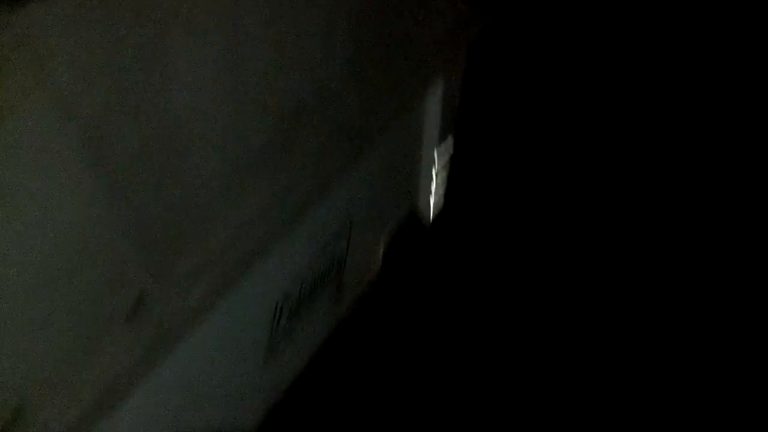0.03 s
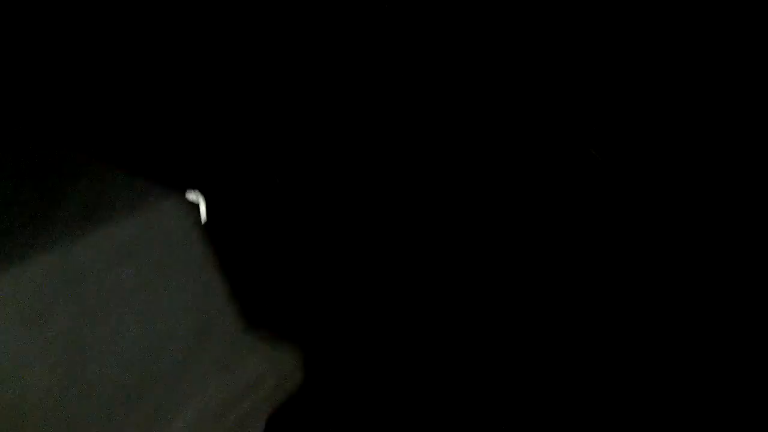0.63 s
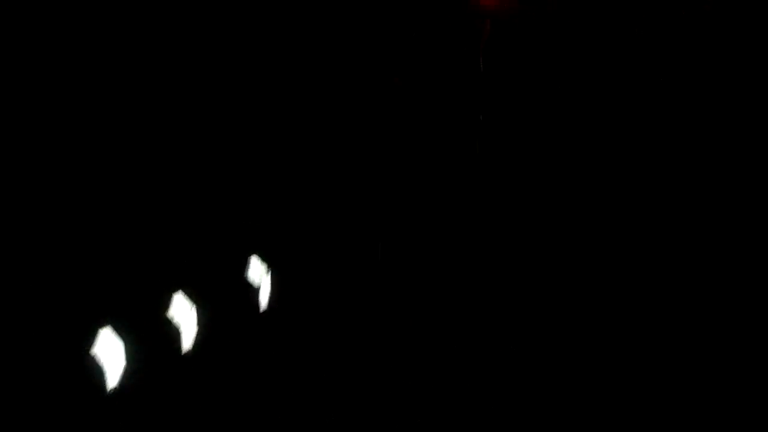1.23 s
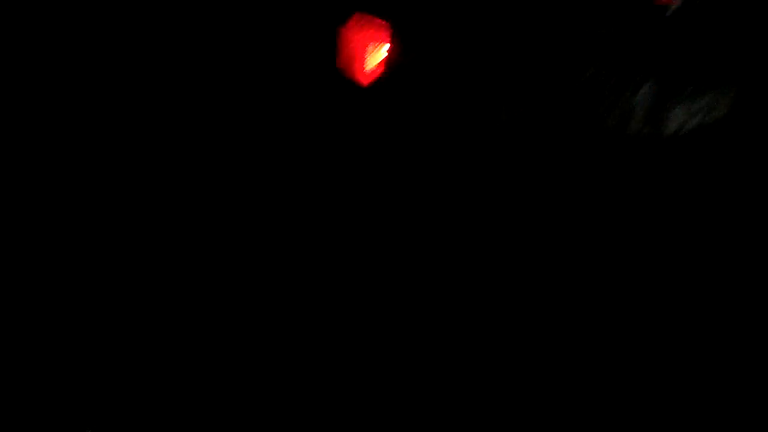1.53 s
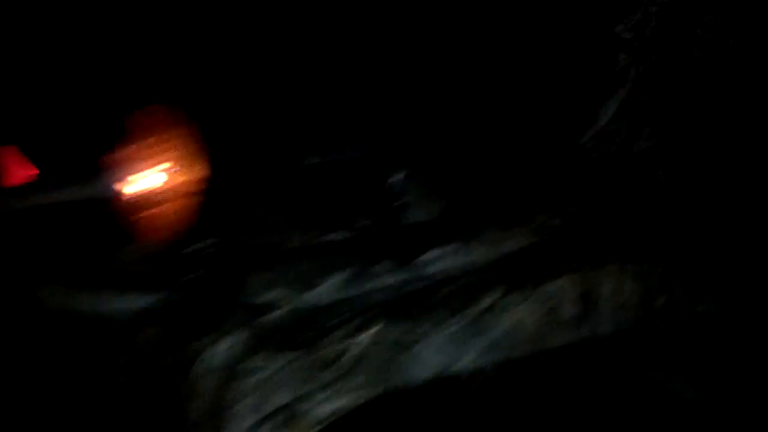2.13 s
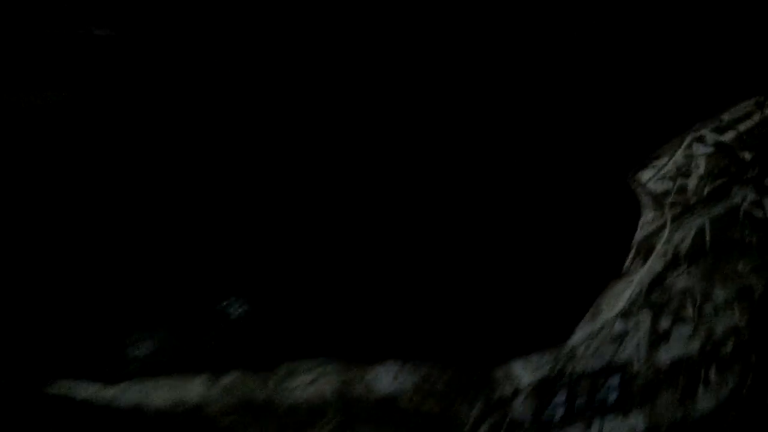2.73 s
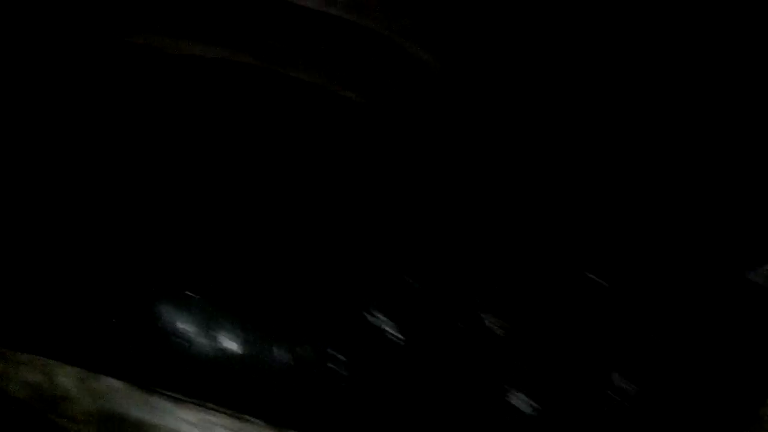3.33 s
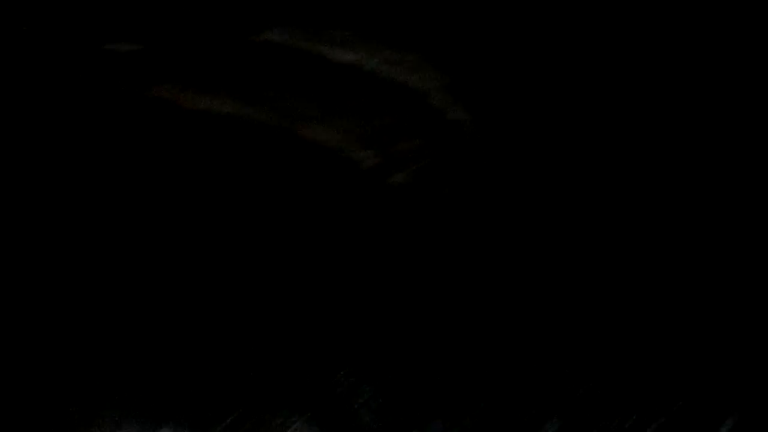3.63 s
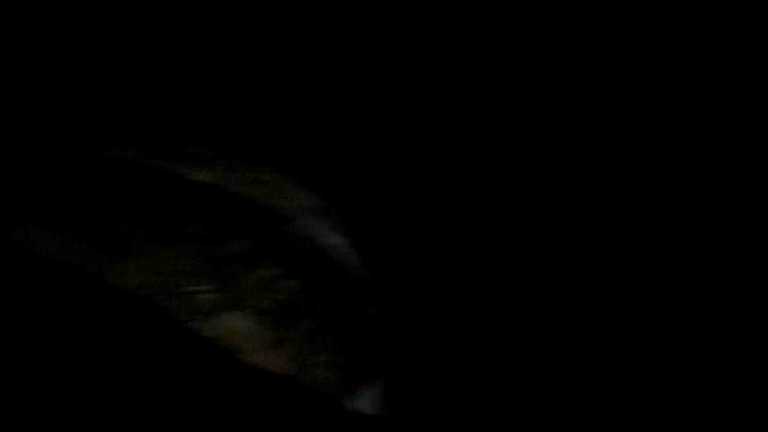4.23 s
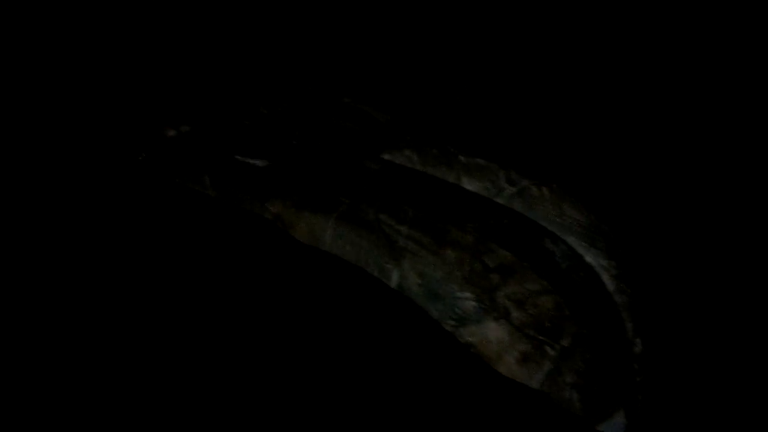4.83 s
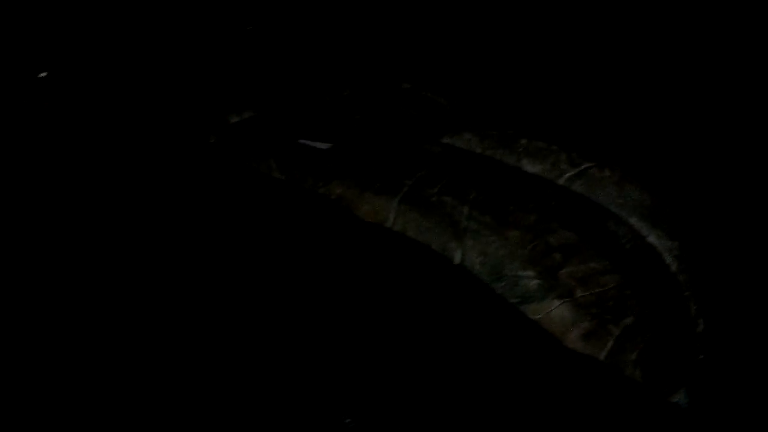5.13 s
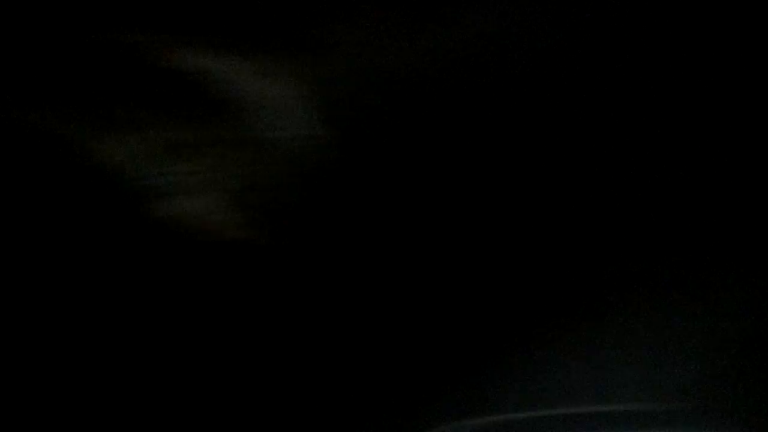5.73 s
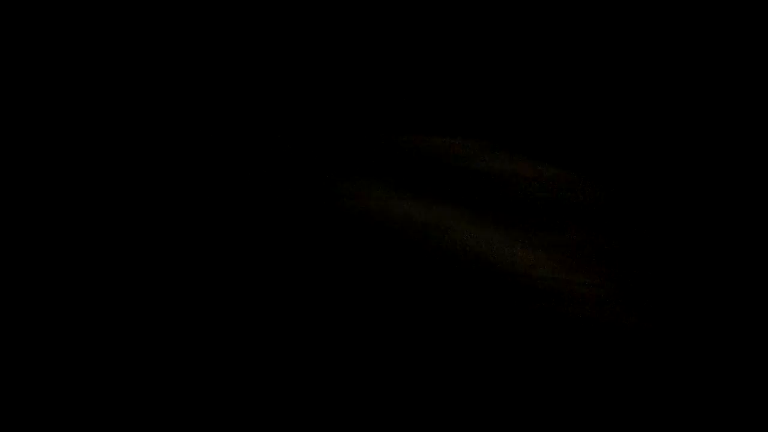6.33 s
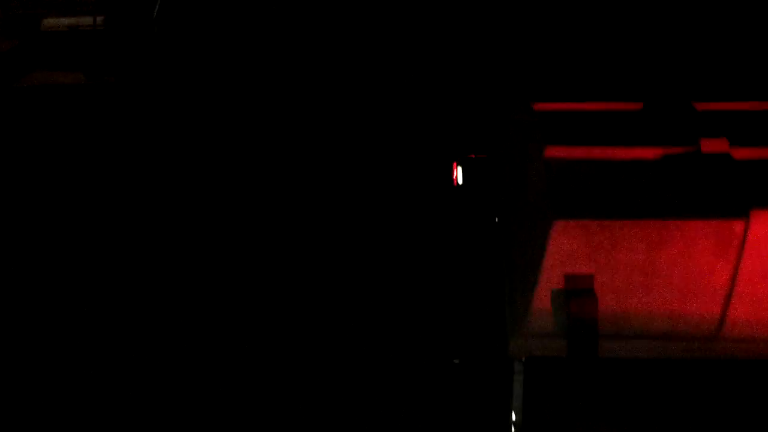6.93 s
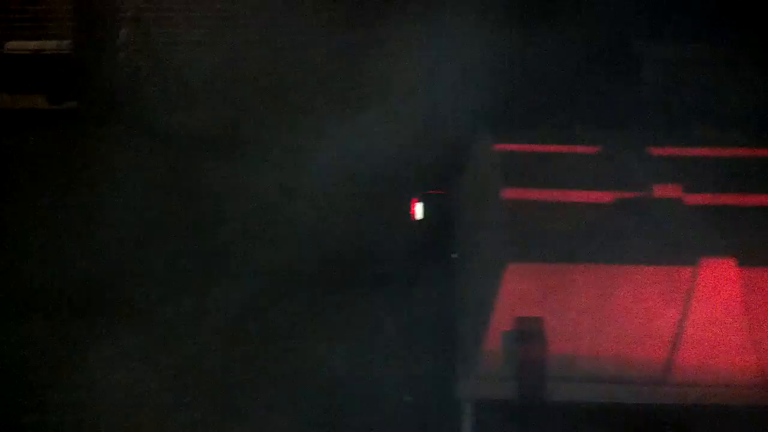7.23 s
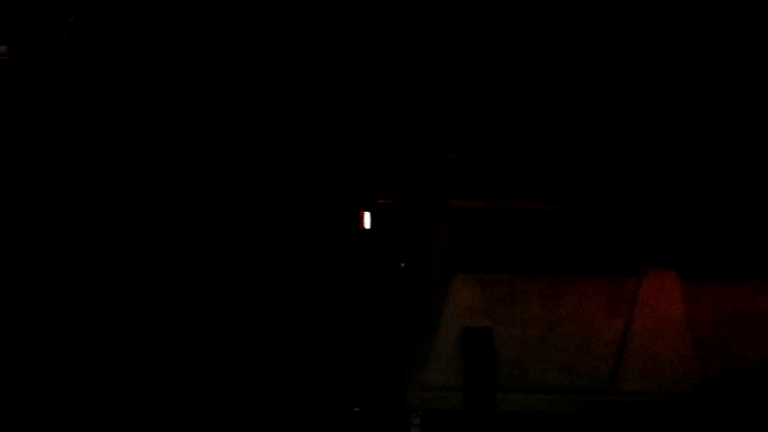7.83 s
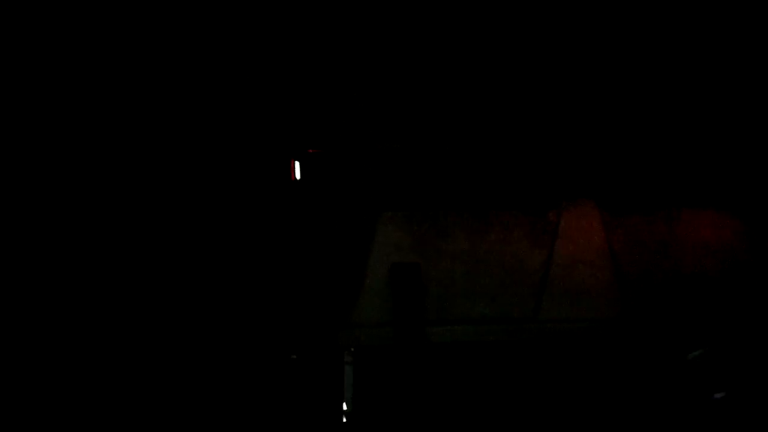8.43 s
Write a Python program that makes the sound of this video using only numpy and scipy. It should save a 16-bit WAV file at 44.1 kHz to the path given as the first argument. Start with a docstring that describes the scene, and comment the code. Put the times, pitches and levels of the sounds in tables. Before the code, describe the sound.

Leafy footsteps and rustling nylon over a steady idling engine, then knocks on a plastic panel, a short zip and small clicks.

```python
"""Leafy ground at night: someone with a handheld camera walks past a pickup idling a little way off.
Leaves crush in grains under each shoe, twigs snap, grit rasps; a nylon jacket fizzes as its threads
catch and slip. A sleeve rubs close by, blows ring a plastic panel on a parked quad bike, a zipper
rasps, and a latch, a switch and other small hard parts click. The camera's stereo widener combs its
two hissing microphones, and its gain control ducks after the sharpest click."""
import sys
import numpy as np
from scipy import signal
from scipy.fft import rfft, irfft
from scipy.io import wavfile
from scipy.ndimage import uniform_filter1d

SR = 44100
rng = np.random.default_rng(int(sys.argv[2]) if len(sys.argv) > 2 else 0)


def file_out(sig):
    """Save sig as 16-bit WAV at sys.argv[1]."""
    # one column per channel
    cols = np.atleast_2d(sig).T
    # limit, then scale
    lim = np.clip(cols, -1, 1)
    pcm = np.round(lim * 32767).astype(np.int16)
    wavfile.write(sys.argv[1], SR, pcm)


N = 374409
T = np.arange(N) / SR

# engine tones: multiple of the crankshaft speed, relative level/dB
ENGINE_ORDERS = [(6, -79.5), (8, -100), (10, -70.5), (12, -70), (18, -78.5), (20, -79), (24, -73.5),
                 (30, -59.5), (36, -82), (44, -66.5), (70, -71.5), (76, -70)]
# how the idle reaches the moving camera: t/s, exhaust gain/dB, bay roar gain/dB, left-right/dB
ENGINE_FADERS = [(0, 8.5, 2.5, -4.5), (1, 12, 1.5, -3.5), (2, 9.5, 2.5, -5), (3, 11.5, 3, -5.5),
                 (3.8, 8, 5, -3.5), (4.6, 0, 3, -3), (5.4, 2, 1.5, 4.5), (6.1, 2.5, -1, -1.5),
                 (6.8, 11.5, 1.5, 4.5), (7.5, 9.5, 1.2, 4.5), (8, 7, 3, 2.5), (8.49, 12, 4.5, 0.5)]
# the engine bay's whine comes forward as the camera nears the pickup: t/s, gain/dB
WHINE_FADER = [(0, -6), (1.5, -2), (6, -1), (7, 1.5)]

# tone colours of the noise layers: f/Hz, relative level/dB
ROAR_EQ = [(25, -22), (45, -33), (80, -7.5), (130, -3), (230, -6.5), (380, -5.5), (680, -8), (890, -5.5),
           (1080, -11.5), (1350, -18), (2000, -18.5), (3000, -21.5), (6000, -30.5), (10000, -34.5)]
HISS_EQ = [(100, 18), (3000, 10), (6500, -5), (9500, -10), (12000, 10.5), (15000, 13.5)]
LEAVES_EQ = [(50, -15), (130, -3), (300, 2), (600, 8.5), (900, -0.5), (1300, 1.5), (1800, -5), (2400, -4.5),
             (3500, -15.5), (7000, -25), (15000, -40)]
NYLON_EQ = [(500, -11), (1500, -3), (2500, -1.5), (4000, -2.5), (6500, -1), (9500, -5), (12000, -2.5),
            (15000, 1.5)]
CREASE_EQ = [(300, -18), (1200, 3), (2200, -3), (4000, 1), (7500, -10.5), (15000, -0.5)]
THUD_EQ = [(30, -10), (90, -10), (170, 1), (280, 1.5), (500, -6), (900, -2.5), (1400, -17), (2500, -21),
           (4500, -32), (8000, -48), (15000, -54)]
CLICK_EQ = [(100, -39), (400, -21), (1500, -30.5), (2700, -12), (4200, -3.5), (5200, -2), (7000, 1.5),
            (10000, -4.5), (12500, 3), (14500, 10)]
GRIT_EQ = [(400, -38), (800, -2), (1000, 4), (1300, 1), (1600, -2), (1900, -16), (2300, -13), (4000, -45)]
SLEEVE_EQ = [(60, -43), (170, -10.5), (260, 0.5), (320, -10.5), (375, 7.5), (440, -2.5), (500, 0.5),
             (570, 4), (680, -9.5), (850, -7), (1300, -23), (2200, -18.5), (2750, -12), (3400, -34)]
CRACK_EQ = [(200, -21), (800, 15.5), (1400, -7), (2200, 4.5), (3500, -2.5), (4800, -10), (7200, -11.5),
            (9000, -17), (15000, -38)]  # hard contact wakes the panel's many small modes
ZIPPER_EQ = [(400, -20), (1500, -21), (3000, 6), (6500, -12), (10000, 1), (12500, 7), (15000, 6)]

# each footfall crushes leaves and swings the jacket:
# peak t/s, rise/s, fall/s, relative leaves level/dB, nylon level/dB, treble tilt/(dB per octave)
FOOTFALLS = [(.13, 0.05, 0.12, -54, -54, -0.5), (.73, 0.061, 0.15, -53, -47.5, 1),
             (1.24, 0.045, 0.037, -59, -42, -2.5), (1.335, 0.012, 0.043, -59, -48, -2),
             (1.39, 0.049, 0.041, -54, -48, -1.5), (1.79, 0.025, 0.092, -63, -47, -1.5),
             (1.98, 0.1, 0.059, -61, -55, -5), (2.14, 0.023, 0.021, -55.5, -49.5, -1.5),
             (2.372, 0.0047, 0.055, -57.5, -45.5, -2), (2.397, 0.014, 0.077, -67, -48, -2.5),
             (2.51, 0.046, 0.098, -51, -51, -2.5), (3.09, 0.016, 0.11, -54, -49, -0.5),
             (3.415, 0.019, 0.059, -51.5, -55, -1), (3.525, 0.039, 0.033, -54, -46, -2.5),
             (3.78, 0.062, 0.032, -74, -45.5, 1), (4.01, 0.056, 0.046, -51.5, -46.5, -1),
             (4.25, 0.11, 0.32, -72, -62, -10)]
# the jacket alone, as the arms move: peak t/s, rise/s, fall/s, level/dB, treble tilt/(dB per octave)
ARM_SWISHES = [(.22, 0.026, 0.023, -54, -5), (.615, 0.027, 0.15, -48, -1), (2.24, 0.012, 0.029, -56, -2),
               (2.922, 0.0078, 0.017, -48.5, 1), (4.68, 0.18, 0.17, -54, -1), (5.425, 0.1, 0.068, -45, 2),
               (5.661, 0.069, 0.15, -45, -0.5), (6.08, 0.036, 0.024, -53, 2.5), (6.54, 0.12, 0.2, -58, -3),
               (8.41, 0.3, 0.14, -58.5, 3)]
# the body never quite rests, but moves less once it stands: t/s, gain/dB
STIR_FADER = [(0, 3.5), (.55, 2), (1.1, -1.5), (2.8, -0.5), (3.3, 1.5), (4.1, 7), (5, -8), (6.3, 0.5),
              (7, -6.5), (8, -9), (8.49, -3.5)]
# heels and soft bumps on the camera: t/s, level/dB, decay/s, low-pass f/Hz, left-right/dB
THUD_CUES = [(0.114, -50, 0.033, 1200, 9), (0.207, -41.5, 0.011, 900, 3), (0.677, -48, 0.019, 400, 1),
             (.723, -41.5, 0.012, 895, -4), (1.102, -44, 0.003, 600, 0), (1.235, -46.5, 0.046, 400, -1),
             (1.329, -53, .01, 2500, -5), (2.374, -52, 0.0085, 3000, 1), (2.517, -42.5, 0.032, 556, 7),
             (2.651, -47, 0.0036, 1800, -8), (3.093, -49, 0.0057, 2000, -12), (3.409, -45, 0.02, 1170, -3),
             (6.569, -52.5, 0.023, 100, -5)]
# twigs and pebbles underfoot: t/s, peak level/dB, f/Hz
TWIG_CUES = [(0.117, -40, 1620), (1.193, -43, 1550), (1.327, -49, 1500), (1.333, -39, 1020),
             (1.999, -42, 1400), (2.3713, -39, 1190), (2.396, -42, 1500), (2.488, -43, 1080),
             (2.651, -40, 760), (3.093, -37, 1080), (3.412, -48, 1230), (3.4881, -32, 1130),
             (3.505, -40, 990), (3.5176, -33, 1370), (3.533, -40, 1200), (3.5442, -33, 1350),
             (3.5525, -39, 1350), (3.585, -38, 1090)]
# a squeak of sole or cloth, and a brief low note: t/s, f/Hz, level/dB, length/s
SQUEAK_CUES = [(0.331, 956, -59, 0.1), (7.809, 538, -50, 0.078)]
# zipper pulls and other small clicks: t/s, level/dB, decay/ms, treble tilt/(dB per octave), ring f/Hz
CLICK_CUES = [(0.678, -33, 0.53, -6, 8860), (1.327, -39, 0.9, -13, 4000), (1.7368, -26, 0.69, 9, 14700),
              (1.955, -25, 0.74, -1, 13000), (2.372, -36.5, 0.86, -10, 1800), (4.417, -45, 2.2, -11, 4000),
              (4.4988, -31, 1.5, 19, 7000), (4.565, -35, 0.73, -10, 12600), (5.6944, -19, 0.77, 1, 14800),
              (5.697, -35, 2.5, -11, 6560), (5.984, -37, 0.82, -1.5, 6840), (7.7803, -43, 1, -4, 9540)]
# a sole drags over grit: peak t/s, rise/s, fall/s, level/dB
SCUFF_CUES = [(3.09, 0.049, 0.064, -54), (3.41, 0.01, 0.017, -52), (3.525, 0.037, 0.061, -48),
              (3.78, 0.036, 0.037, -54)]
# sleeve rubs, leaning in and turning away: peak t/s, rise/s, fall/s, cloth level/dB, hollow level/dB
RUB_CUES = [(4.12, 0.2, 0.33, -53.5, -63), (4.32, 0.049, 0.057, -45.5, -58), (5.42, 0.21, 0.24, -51.5, -57),
            (5.57, 0.053, 0.1, -51.5, -50), (5.685, 0.11, 0.026, -45.5, -47),
            (5.74, 0.036, 0.1, -50.5, -49), (5.86, 0.079, 0.081, -58, -59.5),
            (6.15, 0.18, 0.18, -59.5, -59)]
# the hollow between sleeve and camera opens and closes: t/s, resonance f/Hz
HOLLOW_SWEEP = [(4.1, 390), (5.3, 373), (5.43, 384), (5.5, 546), (5.55, 386), (5.59, 364), (5.64, 443),
                (5.69, 420), (5.72, 546), (5.77, 387), (5.83, 410), (5.92, 370), (6.16, 366)]
# blows on the plastic panel: t/s, relative peak level/dB, contact/ms, relative crack level/dB
KNOCK_CUES = [(4.1537, -21.5, 2.2, -44), (4.159, -29, 0.43, -45), (4.169, -29, 3.1, -65),
              (4.2099, -24.5, 0.26, -37.5), (4.233, -33, 0.37, -59), (4.273, -36, 2.1, -65),
              (4.3265, -23, 3.1, -60), (4.3305, -12, 2.58, -36), (4.334, -10.5, 0.77, -21),
              (4.3381, -15, 0.53, -29.5), (4.392, -36, 5.2, -62)]
# short pulls on the zipper: peak t/s, rise/s, fall/s, level/dB
ZIP_CUES = [(5.646, 0.065, .012, -45), (5.692, 0.043, 0.0062, -38.5)]
# contacts of sprung parts: t/s, ring gain/dB, snap level/dB, favoured f/Hz
LATCH_CUES = [(4.9455, -33, -19, 3800), (4.9472, -24.5, -18.5, 6700), (4.9513, -36, -42, 1200)]
SWITCH_CUES = [(6.571, -30, -34, 15000), (6.5724, -28.5, -36, 12400), (6.574, -27.5, -38, 4950),
               (7.7263, -28.5, -30, 15700), (7.7276, -29, -28, 8000), (7.7293, -34, -38, 4100)]

# what the struck parts ring with: f/Hz, relative level/dB, t60/s
PANEL_MODES = [(109.3, -17.5, 0.67), (158, -5.5, 0.22), (247, 1, 0.074), (278, -6.5, 0.1),
               (330, -4.5, 0.15), (387, -6.5, 0.071), (455, -3.9, 0.1), (565, -11.4, .079), (634, 0, 0.11),
               (886, -8, 0.071), (1060, 6, .037), (1130, -5, 0.066), (1300, -18, 0.1), (1580, -6, 0.031),
               (2330, 6, 0.03), (3280, 1, 0.02)]
LATCH_MODES = [(370, -4, .06), (455, -7, .074), (600, -7.5, .032), (1090, -16, 0.013), (1660, -27, .013),
               (2140, -10, 0.024), (2900, -3, 0.013), (3570, 2, 0.011), (4200, -1, 0.011), (6700, 0, 0.016),
               (7240, -3, 0.0098), (7950, 1, .01), (8900, -5, .008), (11600, -2, .01), (15200, -5, .01)]
SWITCH_MODES = [(4140, -22, 0.076), (4400, -20, .03), (5040, -7.5, 0.016), (7060, -17, 0.057),
                (7900, -3.5, 0.021), (10000, -8.5, 0.028), (11800, -6, .018), (12660, 0.5, 0.013),
                (15300, -1.5, 0.016)]


def amp(db):
    """Decibels to gain."""
    return 10 ** (np.asarray(db) / 20)


def unit(x):
    """Scales to rms 1."""
    return x / np.sqrt(np.mean(x ** 2) + 1e-20)


def curve(rows, column=1):
    """An automation lane: one column of a table, joined by straight lines in time."""
    rows = np.array(rows, float)
    return np.interp(T, rows[:, 0], rows[:, column])


def spectrum(points, hz):
    """Reads an EQ curve in dB on a log-frequency axis."""
    f, db = np.transpose(points)
    return np.interp(np.log(hz + 1), np.log(f + 1), db)


def pan(db):
    """Gains of the two microphones for a left-right difference."""
    return amp(np.array([[.5], [-.5]]) * db)


def add(mix, s, sound):
    """Drops a sound into the mix at s seconds."""
    part = mix[:, max(round(s * SR), 0):][:, :sound.shape[-1]]
    part += sound[..., :part.shape[1]]


def wander(hz):
    """Random drift of rms 1, up to a given rate."""
    lowpass = 1 / (1 + (np.fft.rfftfreq(N, 1 / SR) / hz) ** 4)
    return unit(irfft(rfft(rng.standard_normal(N)) * lowpass, N))


def colour(x, eq, extra_db=lambda f: 0, size=4096):
    """Minimum-phase filter of unit energy, shaped by an EQ curve plus extra_db(Hz)."""
    hz = abs(np.fft.fftfreq(size, 1 / SR))
    log_gain = np.log(amp(np.maximum(spectrum(eq, hz) + extra_db(hz), -100)))
    taps = np.fft.ifft(np.exp(signal.hilbert(log_gain).conj())).real[:size // 2]
    return signal.oaconvolve(x, taps[None] / np.linalg.norm(taps), axes=1)[:, :x.shape[1]]


def treble_octaves(hz, pivot_hz=8000):
    """Octaves above the pivot of a treble tilt, flat below 1 kHz."""
    return np.log2(np.maximum(hz, 1000) / pivot_hz)


def pair(x, likeness):
    """Two independent signals become two partly alike ones."""
    return np.array([x[0], likeness * x[0] + np.sqrt(1 - likeness ** 2) * x[1]])


def grains(per_s, spread_db, smooth, likeness):
    """Tiny slips of very uneven size over a smooth friction noise, in stereo."""
    size = amp(spread_db * np.minimum(rng.exponential(1, N), 4))
    fires = rng.random(N) < per_s / SR
    slips = unit(size * fires * rng.standard_normal((2, N)))
    return pair(unit(slips + smooth * rng.standard_normal((2, N))), likeness)


def burst(decay_s, likeness, count=8192):
    """A dying puff of noise that starts at rms 1."""
    fade = np.exp(-np.arange(count) / SR / decay_s)
    puff = pair(rng.standard_normal((2, count)), likeness) * fade
    return unit(puff) * np.sqrt(np.mean(fade ** 2))


def stroke(s, rise_s, fall_s, db):
    """Power of one movement: a bell-shaped swell up to its peak, then an exponential tail."""
    depth = np.where(T < s, ((T - s) / rise_s) ** 2, (T - s) / fall_s)
    return amp(db) ** 2 * np.exp(-2 * np.minimum(depth, 20))


def strokes(rows, db_column=3):
    """Envelope of several overlapping movements."""
    return np.sqrt(sum(stroke(*row[:3], row[db_column]) for row in rows))


def ring(modes, spread, count=11025):
    """Dying modes, each reaching one microphone a little before the other."""
    t = np.arange(count) / SR
    phases = rng.uniform(-1.25, 1, (len(modes), 1, 1)) * spread * np.array([[1], [-1]])
    return sum(amp(db - 60 * t / t60) * np.cos(2 * np.pi * hz * t + phase)
               for (hz, db, t60), phase in zip(modes, phases))


def engine(crank_hz=11.96, exhaust_below_hz=310, firings_per_turn=6):
    """Exhaust hum and higher whines on a slightly hunting crankshaft, in a roar that throbs."""
    turns = np.cumsum(crank_hz * (1 + 0.00396 * wander(hz=2.51))) / SR
    hum = np.zeros((2, N))
    for order, db in ENGINE_ORDERS:
        phase = 2 * np.pi * (order * turns + rng.random())
        stereo_drift = np.array([[0], [.5]]) * wander(hz=0.56)
        fader_db = curve(ENGINE_FADERS if order * crank_hz < exhaust_below_hz else WHINE_FADER)
        flutter_db = 2.8 * wander(hz=14) + wander(hz=1.8)
        hum += np.sqrt(2) * amp(db - 8.5 + fader_db + flutter_db) * np.cos(phase + stereo_drift)
    throb = 1 + 0.046 * np.cos(2 * np.pi * firings_per_turn * turns)
    roar = colour(rng.standard_normal((2, N)) * throb, ROAR_EQ)
    roar *= amp(-56.5 + curve(ENGINE_FADERS, column=2) + 0.46 * wander(hz=3.0))
    return (hum + roar) * pan(curve(ENGINE_FADERS, column=3))


def mic_hiss():
    """The microphones' own steady noise floor."""
    return amp(-66.5) * colour(rng.standard_normal((2, N)), HISS_EQ)


def leaves():
    """Leaves crush in grains, giving way unevenly under each shoe."""
    weight = np.hypot(strokes(FOOTFALLS), amp(-64.5 + curve(STIR_FADER)))
    crunch = grains(per_s=1400, spread_db=3.0, smooth=1.0, likeness=0.31)
    give = amp(2.0 + 1.4 * wander(hz=29.8))
    return colour(crunch * weight * give, LEAVES_EQ) * pan(db=-2.0)


def jacket_motion(stir_db=-60.5, stir_tilt_db=-1.5):
    """Envelope and treble tilt of the nylon: each stroke has its own brightness; the strongest wins."""
    power = amp(stir_db + curve(STIR_FADER)) ** 2
    tilt = stir_tilt_db * power
    for s, rise_s, fall_s, *_, db, tilt_db in FOOTFALLS + ARM_SWISHES:
        part = stroke(s, rise_s, fall_s, db)
        power += part
        tilt += tilt_db * part
    return np.sqrt(power), tilt / power


def jacket():
    """Nylon threads catch and slip: a fizz that swells with each stroke, and the crackle of creases."""
    level, tilt = jacket_motion()
    fizz = colour(grains(per_s=3500, spread_db=4.5, smooth=3.1, likeness=0.0085), NYLON_EQ)
    hz, t, bands = signal.stft(fizz, SR, nperseg=256)
    # the fizz flickers in small patches of frequency and time
    patches = uniform_filter1d(rng.standard_normal(bands.shape[1:]), size=8, axis=0)
    flicker_db = 3.16 * unit(uniform_filter1d(patches, size=14, axis=1))
    tilt_db = treble_octaves(hz, pivot_hz=10000)[:, None] * np.interp(t, T, tilt)
    fizz = signal.istft(bands * amp(tilt_db + flicker_db), SR, nperseg=256)[1][:, :N]
    creases = colour(grains(per_s=260, spread_db=2.6, smooth=0, likeness=0.7), CREASE_EQ)
    return (fizz + amp(-11.5) * creases) * level


def thuds():
    """Heels land and the camera takes soft bumps: muffled puffs of noise."""
    out = np.zeros((2, N))
    for s, db, decay_s, top_hz, side_db in THUD_CUES:
        puff = burst(decay_s, likeness=.3)
        thud = colour(puff, THUD_EQ, lambda f: -10 * np.log10(1 + (f / top_hz) ** 4))
        add(out, s, amp(db) * thud * pan(side_db))
    return out


def twigs(ring_cycles=1.17, snap_db=-8):
    """Each twig or pebble gives a dull tick of a few cycles and a tiny snap."""
    out, t = np.zeros((2, N)), np.arange(SR // 50) / SR
    for s, db, hz in TWIG_CUES:
        age = t * hz / ring_cycles
        tick = np.sqrt(age) * np.exp(-2 * age) * np.sin(2 * np.pi * hz * t)
        add(out, s, amp(db) * tick / abs(tick).max())
        add(out, s, amp(db + snap_db) * burst(decay_s=0.0003, likeness=.5))
    return out


def squeaks():
    """A squeak and a low note: short, nearly pure tones with a slight waver."""
    out = np.zeros((2, N))
    for s, hz, db, length_s in SQUEAK_CUES:
        count = int(length_s * SR)
        turns = np.cumsum(hz * (1 + 0.035 * wander(hz=40)[:count])) / SR
        add(out, s, amp(db) * np.sqrt(2) * np.sin(2 * np.pi * turns) * np.hanning(count))
    return out


def clicks(ring_db=7, half_width_hz=260):
    """Small hard parts snap home and ring for a few milliseconds."""
    out = np.zeros((2, N))
    for s, db, decay_ms, tilt_db, ring_hz in CLICK_CUES:
        def tilt_and_ring(f):
            return tilt_db * treble_octaves(f) + ring_db / (1 + ((f - ring_hz) / half_width_hz) ** 2)
        snap = burst(decay_ms / 1000, likeness=.1)
        add(out, s, amp(db) * colour(snap, CLICK_EQ, tilt_and_ring))
    return out


def scuffs():
    """Grit rolls under a sole and rasps in the mids."""
    grit = grains(per_s=700, spread_db=1.0, smooth=0.24, likeness=0.84)
    return colour(grit, GRIT_EQ) * strokes(SCUFF_CUES)


def resonate(x, hz, width_hz):
    """A steep resonance that sweeps along the curve hz."""
    carrier = np.exp(2j * np.pi * np.cumsum(hz) / SR)
    pole = np.exp(-np.pi * width_hz / SR)
    return unit((carrier * signal.lfilter([1], [1, -2 * pole, pole ** 2], x / carrier)).real)


def sleeve():
    """Cloth rubs near the camera in uneven slips and sounds the shifting hollow beneath it."""
    cloth = colour(grains(per_s=400, spread_db=3.5, smooth=1.9, likeness=0.37), SLEEVE_EQ)
    friction = pair(rng.standard_normal((2, N)), likeness=0.96)
    hollow = resonate(friction, curve(HOLLOW_SWEEP), width_hz=57)
    rub = cloth * strokes(RUB_CUES) + hollow * strokes(RUB_CUES, db_column=4)
    slips = unit(amp(1.5 * wander(hz=140)))
    return rub * slips * pan(db=-12.5)


def panel_knocks():
    """Each blow briefly pushes the panel: shorter contact wakes higher modes, and hard blows crack."""
    out = np.zeros((2, N))
    low_cut = signal.butter(3, 150, "high", fs=SR, output="sos")  # the knocks carry no deep bass
    body = signal.sosfilt(low_cut, ring(PANEL_MODES, spread=0.52))
    t = np.arange(body.shape[1]) / SR
    for s, db, contact_ms, crack_db in KNOCK_CUES:
        age = t * 1000 / contact_ms
        push = age * np.exp(-4 * age)
        blow = signal.fftconvolve(body, push[None], axes=1)[:, :len(t)]
        add(out, s, amp(db) * blow / abs(blow).max() * pan(db=-3.5))
        crack = 1.4 * burst(decay_s=0.001, likeness=0.6) + burst(decay_s=0.0047, likeness=0.22)
        add(out, s, amp(crack_db) * colour(crack, CRACK_EQ))
    return amp(-3) * out


def sprung(cues, modes, snap_s, tilt_db, focus_db):
    """A sprung part strikes in quick succession: each contact snaps and favours some of its modes."""
    out = np.zeros((2, N))
    for s, ring_db, snap_db, focus_hz in cues:
        woken = [(hz, db - focus_db * abs(np.log2(hz / focus_hz)), t60) for hz, db, t60 in modes]
        add(out, s, amp(ring_db) * ring(woken, spread=1.63))
        snap = colour(burst(snap_s, likeness=0.097), CLICK_EQ, lambda f: tilt_db * treble_octaves(f))
        add(out, s, amp(snap_db) * snap)
    return out


def latch():
    """A latch trips and hits its stop, ringing over a wide range."""
    return sprung(LATCH_CUES, LATCH_MODES, snap_s=0.0018, tilt_db=-2.0, focus_db=3.5)


def zipper(teeth_per_s=420, unevenness=0.61, tooth_s=0.00059):
    """The slider rasps over the teeth at an uneven speed, harder and harder until it stops."""
    speed = np.maximum(1 + unevenness * wander(hz=152), 0.1)
    teeth_passed = np.cumsum(teeth_per_s * speed) / SR
    ticks = np.exp(-(teeth_passed % 1) / (teeth_per_s * tooth_s)) * amp(2.1 * wander(hz=200))
    rasp = unit(pair(rng.standard_normal((2, N)), likeness=0.18) * ticks)
    return colour(rasp, ZIPPER_EQ) * strokes(ZIP_CUES)


def switch():
    """A switch is pressed and let go, each time with a thin, bright ring."""
    return sprung(SWITCH_CUES, SWITCH_MODES, snap_s=0.0015, tilt_db=-1.5, focus_db=15)


def outdoor_echo(x, t60=0.043, count=9000):
    """Scattered echoes from the vehicles and the ground."""
    taps = rng.standard_normal((2, count)) * (rng.random((2, count)) < .06)
    taps *= amp(-60 * np.arange(count) / SR / t60)
    taps[:, :SR // 300] = 0  # pre-delay
    return signal.oaconvolve(x, taps / np.linalg.norm(taps, axis=1, keepdims=True), axes=1)[:, :N]


def scene():
    """The mix at the two microphones; only the knocks and clicks feed a faint echo."""
    hiss = mic_hiss()
    sprung_parts = latch() + switch()
    panel = panel_knocks()
    small_parts = sprung_parts + clicks()
    echo = outdoor_echo(amp(-15) * panel + amp(-16) * small_parts)
    pickup = engine()
    feet = leaves() + thuds() + twigs() + scuffs()
    clothes = jacket() + sleeve() + zipper()
    return pickup + hiss + feet + clothes + squeaks() + panel + small_parts + echo


def widen(x, delay_samples=16, above_hz=850, bass_hz=85):
    """Above the bass, each channel loses a delayed copy of the other; the shared deep bass is cut."""
    bins, hz = rfft(x), np.fft.rfftfreq(N, 1 / SR)
    share = 1 / (1 + (above_hz / (hz + 1)) ** 4)
    crossfeed = np.exp(-2j * np.pi * hz * delay_samples / SR) * bins[::-1]
    wide = (bins - share * crossfeed) / np.sqrt(1 + share ** 2)
    shared_bass = wide.mean(0) / (1 + 1j * hz / bass_hz)
    return irfft(wide - shared_bass, N)


def duck(x, threshold_db=-33, slope=0.71, recovery_db_per_s=19, attack_s=0.075):
    """Gain control listens above the bass, falls quickly and recovers slowly."""
    sidechain = signal.sosfilt(signal.butter(1, 1200, "high", fs=SR, output="sos"), x)
    power_db = 10 * np.log10(abs(uniform_filter1d((sidechain ** 2).mean(0), size=180)) + 1e-12)
    over_db = np.maximum(power_db - threshold_db, 0)
    recovery = T * recovery_db_per_s
    cut_db = np.maximum.accumulate(slope * over_db + recovery) - recovery
    pole = np.exp(-1 / (attack_s * SR))
    return x * amp(-signal.lfilter([1 - pole], [1, -pole], cut_db))


def record(dry):
    """The camera's chain: stereo widener, gain control, high cut at 16.1 kHz."""
    high_cut = signal.firwin(511, 16100, window=("kaiser", 9), fs=SR)
    return signal.oaconvolve(duck(widen(dry)), high_cut[None], "same")


dry = scene()
out = record(dry)
file_out(out)
```